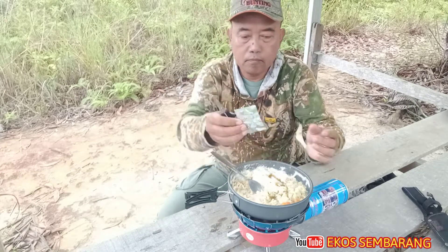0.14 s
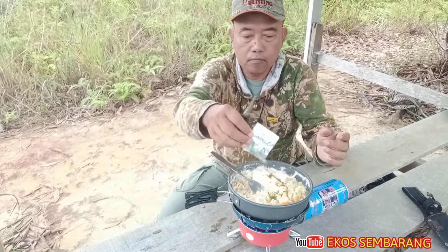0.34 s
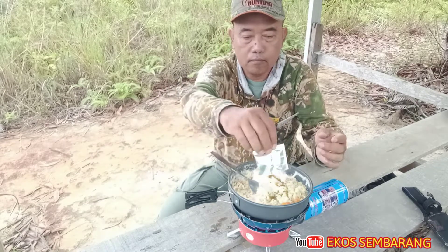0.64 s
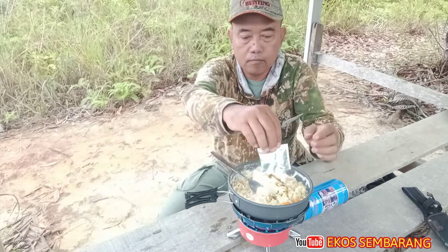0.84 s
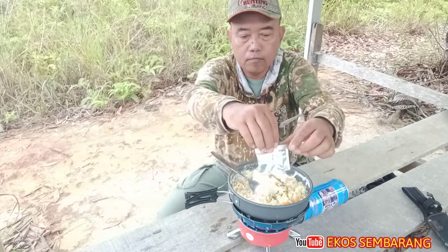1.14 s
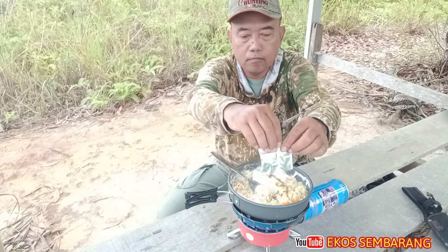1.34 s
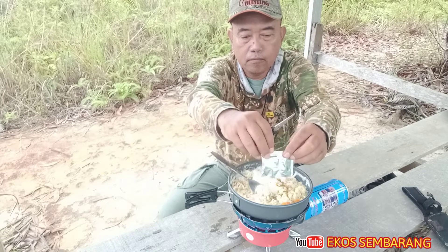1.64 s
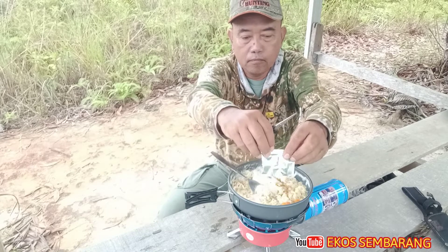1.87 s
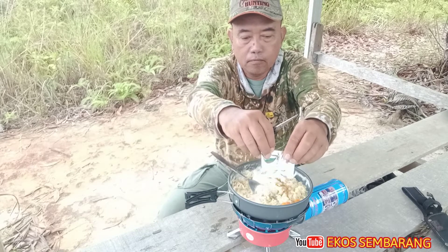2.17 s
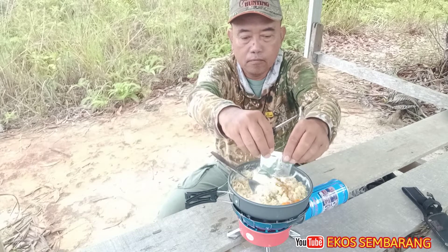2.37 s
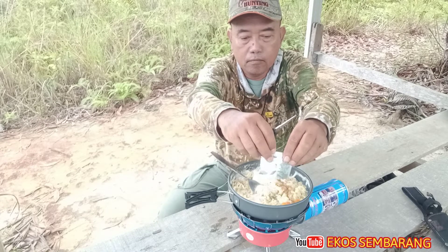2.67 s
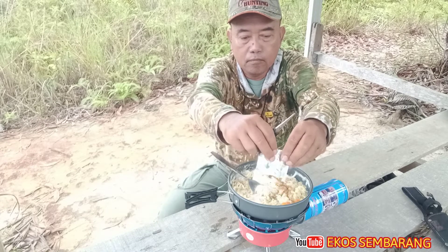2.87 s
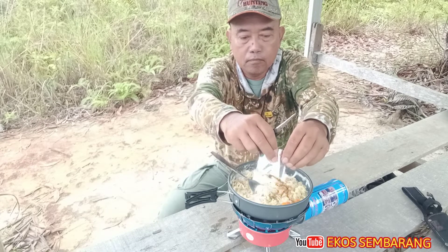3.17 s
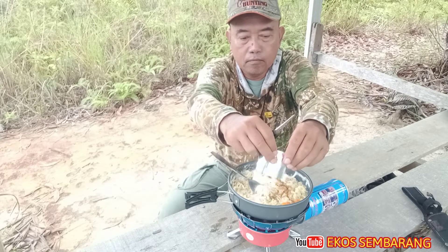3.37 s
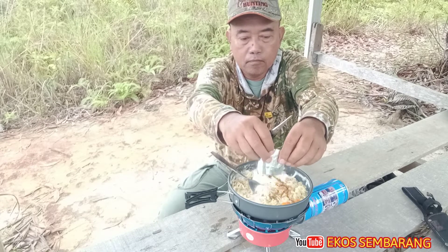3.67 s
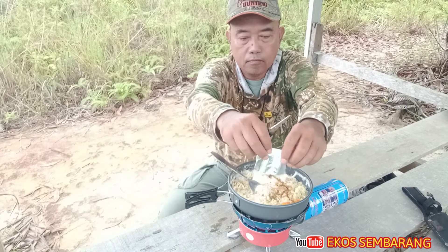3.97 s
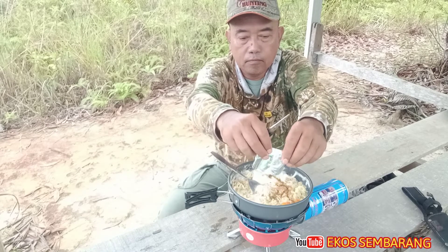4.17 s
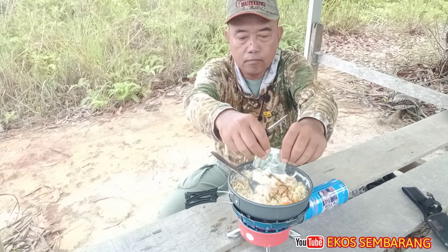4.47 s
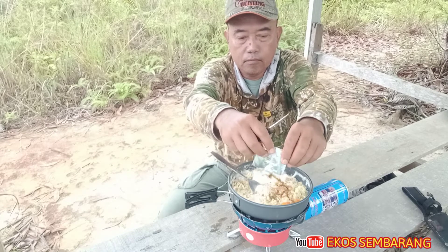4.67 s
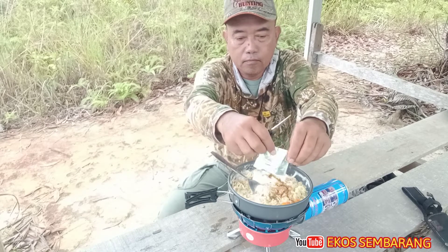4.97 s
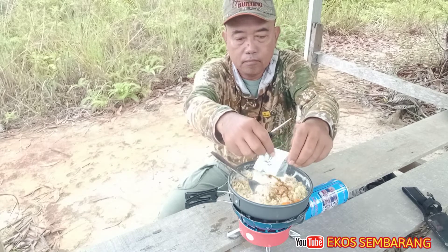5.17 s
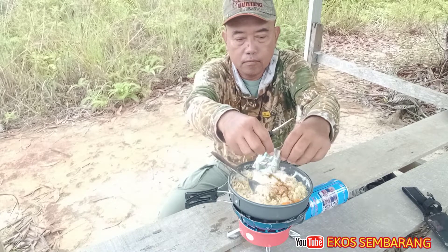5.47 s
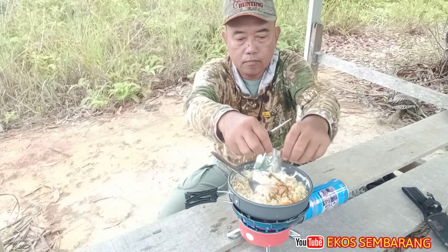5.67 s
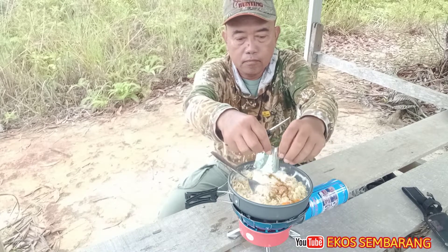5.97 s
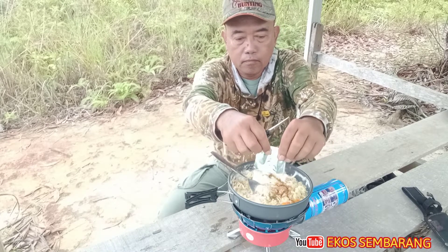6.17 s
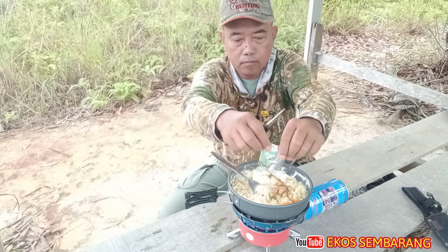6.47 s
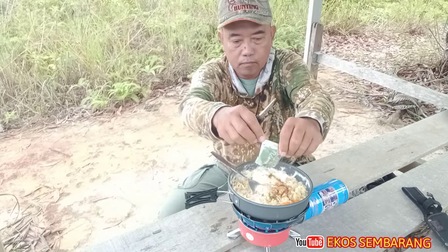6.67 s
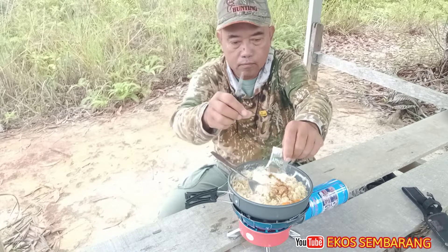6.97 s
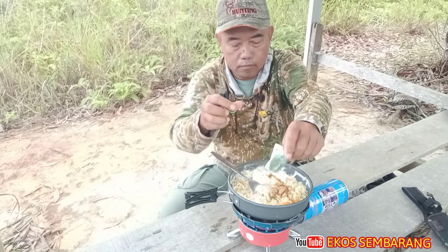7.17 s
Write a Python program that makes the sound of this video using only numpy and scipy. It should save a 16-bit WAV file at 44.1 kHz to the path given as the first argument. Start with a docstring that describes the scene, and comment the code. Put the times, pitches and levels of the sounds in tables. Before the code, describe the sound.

A steady shrill insect chorus fills the open air, led by one near cricket and later joined by a second drifting in and out of step. Close to the microphone under a simple shelter, fingers squeeze a plastic packet: sparse snaps first, then frequent dry crinkles and sharp creases, loudest near the end. Behind are faint upward bird whistles, low engine pulsing and soft outdoor air.

```python
"""Bush crickets rasp first: a close pair over a wash of far insects in tall grass.
Nearer the microphone, fingers squeeze and crease a plastic seasoning sachet under a shelter: noise bursts
and random ticks rung through the film's tone. Gliding sines make a rising whistle and faint, blurred falling
tones. Far away a slow engine thuds, pulses through exhaust and casing, under soft filtered-noise air."""
import sys
import numpy as np
from scipy import signal
from scipy.fft import rfft, irfft, next_fast_len
from scipy.io import wavfile
from scipy.ndimage import uniform_filter1d, map_coordinates

SR = 44100
rng = np.random.default_rng(int(sys.argv[2]) if len(sys.argv) > 2 else 0)


def store_pcm(level_fs):
    """Save levels as 16-bit WAV."""
    pcm = np.round(np.clip(level_fs, -1, 1) * 32767).astype(np.int16)
    wavfile.write(sys.argv[1], SR, np.atleast_2d(pcm).T)


N = 322371


def amp(db):
    """Decibels to gain."""
    return 10 ** (np.asarray(db) / 20)


def unit(x):
    """Scale to rms 1."""
    return x / np.sqrt(np.mean(x ** 2) + 1e-20)


def along(points, hz):
    """Read (frequency [Hz], value) points on a log frequency axis."""
    f, v = np.transpose(points)
    return np.interp(np.log(hz + 1), np.log(f + 1), v)


def curve(rows):
    """One value per sample from (time [s], value) rows."""
    return np.interp(np.arange(N) / SR, *np.transpose(rows))


def wobble(rate, size=N):
    """A smooth random curve, rate knots a second."""
    knots = rng.standard_normal(int(size * rate / SR) + 4)
    return map_coordinates(knots, [np.arange(size) * rate / SR])


def add(track, s, sound):
    """Mix a sound in at time s."""
    i = round(s * SR)
    a, b = max(i, 0), min(i + len(sound), N)
    if b > a:
        track[a:b] += sound[a - i:b - i]


def colour(x, points, size=16384):
    """Causal minimum-phase filter with the gains of (frequency [Hz], level [dB]) points."""
    cepstrum = irfft(np.log(amp(along(points, np.fft.rfftfreq(size, 1 / SR)))))
    cepstrum[1:size // 2] *= 2
    cepstrum[size // 2 + 1:] = 0
    impulse = irfft(np.exp(rfft(cepstrum)))
    return signal.fftconvolve(x, impulse)[:len(x)]


def band(x, lo_hz, hi_hz):
    """Causal band-pass."""
    sos = signal.butter(2, [lo_hz, min(hi_hz, SR / 2 - 1)], 'band', fs=SR, output='sos')
    return signal.sosfilt(sos, x)


def echo(x, decays):
    """Scattered reflections from the place, each frequency dying at its own speed."""
    hz, t, z = signal.stft(rng.standard_normal(SR), SR, nperseg=256)
    tail = signal.istft(z * amp(-60 * t / along(decays, hz)[:, None]), SR)[1]
    return signal.fftconvolve(x, tail / np.linalg.norm(tail))[:N]


# tone of the open air around the microphone: (frequency [Hz], relative density [dB per Hz])
AIR_TONE = [(25, -45), (45, -30.5), (80, -7), (150, -4.5), (200, -10.5), (290, -23), (400, -29.5),
            (650, -29), (950, -19), (1300, -23.5), (2000, -33), (2700, -30), (4000, -33.5), (5200, -30.5),
            (9000, -75)]


def air(patchy_db=3.0):
    """Soft outdoor background noise, its level varied at random over time and frequency, less in the bass."""
    hz, _, z = signal.stft(rng.standard_normal(N), SR, nperseg=1024)
    variation = rng.standard_normal(z.shape)
    variation = uniform_filter1d(variation, size=6, axis=0)  # blur across frequency
    variation = uniform_filter1d(variation, size=7, axis=1)  # and across time
    depth = np.clip(hz / 400, 0, 1)[:, None]
    noise = signal.istft(z * amp(patchy_db * depth * unit(variation)))[1][:N]
    return amp(-57.5) * unit(colour(noise, AIR_TONE))


CYCLE_HZ = 9.635  # mean engine cycles a second
# the far engine's three cylinders: (place in the cycle [fraction], relative level [dB])
CYLINDERS = [(.83, 0), (.165, -1), (.44, -1)]
# tone of its exhaust: (frequency [Hz], relative level [dB])
EXHAUST_TONE = [(8, -75), (25, -70), (40, -5), (58, -18), (67, -20), (78, -2), (96, 6), (106, -17.5),
                (116, -13), (135, -1), (200, -20.5), (260, -33), (330, -46), (600, -37)]
# resonances of its casing: (frequency [Hz], width [Hz], relative level [dB])
CASING_MODES = [(139.2, 12.4, 0), (163.8, 4, -1), (215, 4.2, -25)]


def engine():
    """A slow engine: once a cycle the exhaust thuds and the valves clatter; every cylinder knocks the casing."""
    turns = CYCLE_HZ * np.arange(N) / SR + .38 + .012 * wobble(2)

    def beats(lag):
        """One impulse a cycle, of wandering strength."""
        cycle = np.floor(turns - lag)
        return np.diff(cycle, prepend=cycle[0]) * amp(.9 * wobble(10))

    thud = unit(band(colour(beats(CYLINDERS[0][0]), EXHAUST_TONE), 55, 600))
    t = np.arange(SR // 2) / SR
    ring = np.zeros(len(t))
    for hz, width, db in CASING_MODES:
        ring += amp(db) * width * np.exp(-np.pi * width * t) * np.sin(2 * np.pi * hz * t)
    knocks = sum(amp(db) * beats(lag) for lag, db in CYLINDERS)
    drone = unit(band(signal.fftconvolve(knocks, ring)[:N], 52, 250))
    puffs = np.exp(-4 * ((turns - .5) % 1)) * rng.standard_normal(N)
    clatter = unit(band(puffs, 875, 1050))
    return amp(-56.0) * thud + amp(-51.5) * drone + amp(-67.5) * clatter


# rising whistles from the trees: (end time [s], relative level [dB], length [s])
WHISTLES = [(0.909, -45.5, 0.096), (1.354, -47, 0.15), (1.755, -49, 0.17), (2.496, -48.5, 0.17),
            (2.957, -47.5, 0.13), (3.618, -48, 0.19), (4, -49.5, 0.15), (5.689, -49.5, 0.14),
            (6.227, -48, 0.15)]
# pitch of each whistle: (time from its end [s], frequency [Hz])
GLIDE = [(-.18, 3364), (-.06, 3409), (-.03, 3580), (-.015, 3950), (0, 4940)]
# loudness of each whistle: (time from its end [share of length], relative level [dB])
SWELL = [(-1, -22), (-.5, -9), (-.27, 0), (-.16, 0), (0, -12)]
# faint falling tones: the high ones are the whistle's ring in the woods, the low ones of unknown source:
# (start time [s], length [s], first frequency [Hz], last frequency [Hz], relative level [dB])
FALLING_TONES = [(0.927, 0.36, 4940, 4370, -62), (1.451, 0.12, 634, 586, -65), (1.6, 0.14, 843, 794, -62),
                 (1.883, 0.33, 4810, 4280, -63), (1.91, 0.053, 2570, 2280, -65),
                 (2.142, 0.033, 2520, 2280, -60), (2.222, 0.0276, 2340, 2140, -60.5),
                 (2.464, 0.035, 2350, 2150, -63), (4.929, 0.42, 640, 538, -70.5),
                 (5.707, 0.32, 4760, 4300, -62.5)]
# the short answer of the shelter: (frequency [Hz], 60 dB decay time [s])
SHELTER = [(200, 0.037), (2000, 0.083), (12000, 0.016)]
# the long answer of the woods: (frequency [Hz], 60 dB decay time [s])
WOODS = [(500, .45), (3500, 0.58), (5000, 0.9)]


def whistle_and_falling_tones():
    """A bird's held note swells and flicks upward; faint falling tones are heard only as a blur of echoes."""
    whistles, falling = np.zeros(N), np.zeros(N)
    for end, db, length in WHISTLES:
        t = np.arange(-length, 0, 1 / SR)
        swell_db = np.interp(t / length, *np.transpose(SWELL)) + 2.1 * wobble(77.2, size=len(t))
        swell = amp(swell_db) * signal.windows.tukey(len(t), .08)
        hz = np.interp(t, *np.transpose(GLIDE)) * (1 + 0.0047 * wobble(25.7, size=len(t)))
        add(whistles, end - length, amp(db) * swell * np.sin(2 * np.pi * np.cumsum(hz) / SR))
    for s, length, first, last, db in FALLING_TONES:
        u = np.linspace(0, 1, int(length * SR))
        hz = (first + (last - first) * u) * (1 + .035 * wobble(250, size=len(u)))
        swell = np.abs(np.sin(np.pi * u)) ** .5
        add(falling, s, amp(db) * swell * np.sin(2 * np.pi * np.cumsum(hz) / SR))
    both = whistles + falling
    return amp(2.5) * whistles + amp(-2.5) * echo(both, SHELTER) + amp(3) * echo(both, WOODS)


TOOTH_HZ = 7310  # nominal rate of file teeth, before each singer's and stroke's own shift
# the wing strokes of one chirp: (delay [s], half length [s], relative level [dB])
STROKES = [(-.013, .0045, -5), (.001, .0046, 0), (.0144, .0048, 0)]


def cricket(clock, pitch, octave_db, rasp=0.17, scatter_db=2.0):
    """Each wing stroke drags a file over a scraper; the pitch sags as the wing slows."""
    s, count = np.transpose(clock)
    song = np.zeros(N)
    for start in np.interp(np.arange(count[-1] + 1), count, s):
        for delay, half, db in STROKES:
            force, late, detune = rng.standard_normal(3)
            u = np.linspace(-1, 1, int(2 * half * SR))
            sag = .1 * np.exp(-.35 * force) * ((u + .25) / 1.25) ** 2
            # a quieter kind of stroke is lower; a weak one sags more
            hz = pitch * TOOTH_HZ * (1 + .008 * db + .003 * detune - sag)
            uneven_teeth = rasp * wobble(1810, size=2048)[:len(u)]
            phase = 2 * np.pi * np.cumsum(hz) / SR + uneven_teeth
            # the octave is strongest at full wing speed
            speed = np.exp(-((u + .2) / .38) ** 2) + .12
            octave = amp(octave_db + 2 * db + scatter_db * force) * speed
            pressure = signal.windows.tukey(len(u), .85)
            stroke = pressure * (np.sin(phase) + octave * np.sin(2 * phase))
            add(song, start + delay + .0003 * late - half, amp(db + scatter_db * force) * stroke)
    return song


# the wash of far insects: (frequency [Hz], relative density [dB per Hz])
CHORUS_TONE = [(3800, -62), (5000, -40), (5700, -27), (6050, -13), (6450, -6), (6640, 2), (6760, -3),
               (7250, -3), (7550, -14), (8200, -24), (9500, -35), (11400, -41), (12700, -26), (14000, -17),
               (14600, -14), (15000, -19), (15800, -21)]
# the far singers swell, then nearly hold: (time [s], level before the wash and voice gains [dB])
FAR_EFFORT = [(0, -38), (1.4, -35), (7.3, -34.5)]


def chorus(count=5):
    """Farther singers, a little lower in pitch and each at its own tempo, over the wash of countless others."""
    voices = np.zeros(N)
    for tempo, lead, pitch in rng.standard_normal((count, 3)):
        chirps = np.ceil(N / SR * 20)
        chirps_per_s = np.clip(18.7 + .4 * tempo, 1, 19.6)
        clock = [(-abs(lead) / 10, 0), (chirps / chirps_per_s, chirps)]
        voices += cricket(clock, pitch=.945 + .018 * pitch, octave_db=-18)
    wash = unit(colour(rng.standard_normal(N), CHORUS_TONE))
    return amp(curve(FAR_EFFORT)) * (amp(-1.6) * wash + amp(-4.5) * unit(voices))


# wing clocks of the two nearest crickets: (time [s], chirps sung so far [count])
NEAR_CLOCK = [(-.0185, 0), (1.3335, 24), (2.5235, 45), (3.201, 57), (4.224, 75), (5.702, 101),
              (7.3405, 130)]
RIVAL_CLOCK = [(-.036, 0), (4.1775, 79), (5.8605, 110), (6.245, 117), (7.347, 137)]
# their effort: (time [s], nominal level [dB])
NEAR_EFFORT = [(0, -28), (.7, -28), (1.4, -27), (3, -27.5), (4.4, -29.5), (7.3, -26)]
RIVAL_EFFORT = [(0, -70), (1.5, -49), (3.5, -30.5), (5, -27), (6.4, -32), (7.3, -32.5)]
# how the trees answer them: (frequency [Hz], 60 dB decay time [s])
TREES = [(200, 0.24), (3500, 0.52), (7000, 0.52), (15000, 0.1)]


def near_crickets():
    """Two close singers at slightly different tempos drift in and out of step."""
    near = cricket(NEAR_CLOCK, pitch=1, octave_db=-2)
    rival = cricket(RIVAL_CLOCK, pitch=1, octave_db=-4.5)
    song = amp(curve(NEAR_EFFORT)) * near + amp(curve(RIVAL_EFFORT)) * rival
    return song + amp(-21) * echo(song, TREES)


# a sleeve brushes by as the free hand reaches over: (start time [s], length [s], nominal level [dB])
SLEEVE = (0.49, 0.72, -65)


def sleeve(lo_hz=1700, hi_hz=3300):
    """Cloth slides softly, its noise swelling and fading with the arm's speed."""
    start, length, db = SLEEVE
    speed = np.sin(np.pi * np.clip((np.arange(N) / SR - start) / length, 0, 1))
    return amp(db + 2.4 * wobble(29.9)) * speed * unit(band(rng.standard_normal(N), lo_hz, hi_hz))


TAP_T60_S = 0.057
# dull taps of the fingers on the sachet: (time [s], peak level [dB])
TAPS = [(2.026, -50), (3.206, -53), (4.915, -49), (5.534, -43), (5.812, -48), (6.005, -36.5), (6.372, -49)]


def taps(lo_hz=380, hi_hz=850):
    """A fingertip knocks the filled sachet with a short dull puff of noise."""
    t = np.arange(SR // 10) / SR
    sound = np.zeros(N)
    for s, db in TAPS:
        puff = band(rng.standard_normal(len(t)) * amp(-60 * t / TAP_T60_S), lo_hz, hi_hz)
        add(sound, s, amp(db) * puff / np.abs(puff).max())
    return sound


# tone of the plastic film: (frequency [Hz], relative density [dB per Hz])
FILM_TONE = [(300, -15), (800, -13), (1300, 2), (2100, -6.5), (3700, 2), (5500, 0), (8000, 3), (12000, -21),
             (16000, -32.5)]


def film(x, vary_db):
    """The ring of the plastic film, a little different each time it is called on."""
    tone = [(hz, level + vary_db * rng.standard_normal()) for hz, level in FILM_TONE]
    return colour(x, tone, size=1024)


CRINKLES_PER_S, CRINKLE_SPREAD_DB = 450, 8


def crinkles(size, rate, treble_db=-9):
    """Tiny folds giving way at random, most of them weak; rms 1."""
    sizes = amp(CRINKLE_SPREAD_DB * np.minimum(rng.exponential(size=size), 3))
    ticks = sizes * rng.standard_normal(size) * (rng.random(size) < rate / SR)
    bright = band(ticks, 7500, 13000)
    return unit(film(ticks, vary_db=3.0) + amp(treble_db) * bright)


SQUEEZE_ATTACK_S, SQUEEZE_RELEASE_S = 0.0027, .015
TICKING_FROM_S, TICKING_DB = 0.88, -60.5  # faint steady ticking of the film begins here; its nominal level
# the fingers squeeze the sachet: (start time [s], length before release [s], rms level before echo [dB])
SQUEEZES = [(2.016, 0.028, -50.5), (2.472, .24, -57.5), (2.786, 0.073, -49.5), (2.898, .03, -50.5),
            (2.977, 0.031, -46), (3.082, 0.15, -50), (3.43, 0.092, -53), (3.641, 0.17, -47),
            (3.878, 0.034, -44.5), (4.027, 0.11, -57.5), (4.352, 0.044, -56.5), (4.443, 0.054, -49),
            (4.726, 0.06, -48), (4.86, 0.073, -48), (5.02, 0.02, -54.5), (5.181, 0.089, -54.5),
            (5.328, 0.041, -47.5), (5.516, 0.14, -50), (5.752, 0.12, -48.5), (6.28, 0.098, -47.5),
            (6.546, 0.084, -50), (6.765, 0.16, -51.5), (6.95, 0.024, -49), (7.172, 0.082, -51.5)]


def rustle(ticking_rate=160):
    """Each squeeze sets off a shower of crinkles; between squeezes the film ticks faintly."""
    ticking = np.clip(crinkles(N, ticking_rate), -12, 12) * amp(2 * wobble(9))
    sound = amp(TICKING_DB) * ticking * (np.arange(N) / SR > TICKING_FROM_S)
    for s, length, db in SQUEEZES:
        t = np.arange(int((length + SQUEEZE_RELEASE_S) * SR)) / SR
        attack = t / SQUEEZE_ATTACK_S
        release = 1 - (t - length) / SQUEEZE_RELEASE_S
        pressure = np.clip(np.minimum(attack, release), 0, 1)
        shower = crinkles(size=16384, rate=CRINKLES_PER_S)[:len(t)]
        add(sound, s, amp(db) * unit(pressure * shower))
    return sound + amp(-4) * echo(sound, SHELTER)


# the loudest creases of the sachet snapping, close to the microphone:
# (time [s], peak level in 1250-5500 Hz [dB], treble level relative to the middle band [dB])
CREASES = [(1.285, -35, -18), (1.431, -34, -27), (1.6768, -32.5, -19), (1.7025, -27.5, -17),
           (2.0538, -28.5, -4), (2.6671, -35.5, -16), (2.7941, -29, -6), (2.9833, -28.5, -3.5),
           (3.0663, -27.5, -9), (3.1676, -28, -6), (3.2214, -27, -3.5), (3.2994, -27, -11),
           (3.4299, -22.5, -10), (3.487, -32.5, -3), (3.5681, -26, -27), (3.756, -26.5, -24),
           (3.8122, -36, -29), (3.8837, -29, -1), (3.911, -28, -5), (3.9833, -31, -6), (4.0438, -23.5, -19),
           (4.0924, -29, -18), (4.132, -29, -8), (4.6443, -31, -21), (4.8507, -33.5, -20),
           (4.905, -31, -16), (4.933, -33, -26), (5.1256, -30, -6), (5.256, -33, -2), (5.3231, -29, -7),
           (5.404, -27, -10), (5.456, -28.5, -15), (5.5363, -21.5, -10), (5.7149, -30.5, -16),
           (6.0057, -24.5, -14), (6.119, -33, -18), (6.373, -23, -20), (6.4233, -25, -1),
           (6.4964, -26.5, -13), (6.7615, -26, -14), (6.8642, -26, -4), (6.9391, -17, -27),
           (7.024, -31, -21), (7.0625, -23, -17)]


def creases(snap_t60=0.0083, after_db=-11, ring_db=-17, ring_t60=0.17):
    """A crease buckles in quick little steps; thin folds add a bright tick."""
    t = np.arange(4096) / SR
    snaps = np.zeros(N)
    for s, db, treble_db in CREASES:
        lags = rng.uniform(0.0018, .012, (2, 1))  # the fold runs on in two smaller jumps
        jumps = (amp(after_db - 60 * np.abs(t - lags) / snap_t60) * (t > lags)).sum(0)
        reflections = amp(ring_db - 60 * t / ring_t60) * (t > .004)  # table and roof answer
        burst = rng.standard_normal(len(t)) * (amp(-60 * t / snap_t60) + jumps + reflections)
        burst[0] += 3  # an extra kick on the first break
        body = unit(band(film(burst, vary_db=4.0), 610, 7300))
        crack = body + amp(treble_db) * unit(band(burst, 7500, 13000))
        add(snaps, s, amp(db) * crack / np.abs(band(crack, 1250, 5500)).max())
    return snaps


def scene():
    """Everything at one microphone."""
    hands = creases() + rustle() + taps() + sleeve()
    return (near_crickets() + chorus() + hands + whistle_and_falling_tones() + engine() + air())[None]


TOP_HZ = 15860  # the recorder's band limit


def record(dry):
    """The recorder keeps nothing above its band limit."""
    size = next_fast_len(N + SR)
    kept = np.fft.rfftfreq(size, 1 / SR) < TOP_HZ
    return irfft(rfft(dry, size) * kept, size)[:, :N]


dry = scene()
out = record(dry)
store_pcm(out)
```